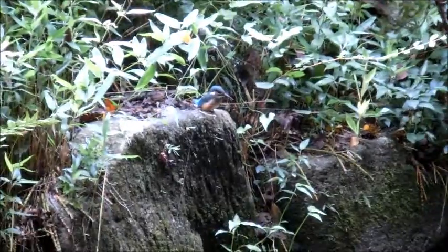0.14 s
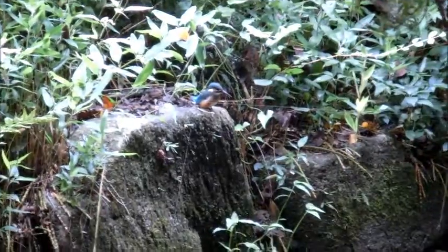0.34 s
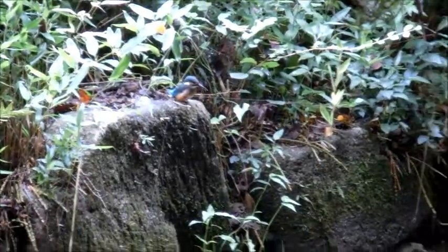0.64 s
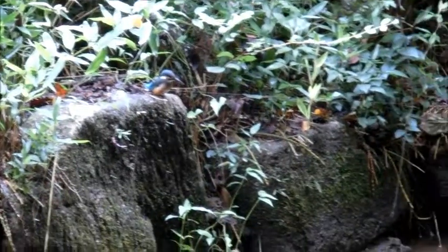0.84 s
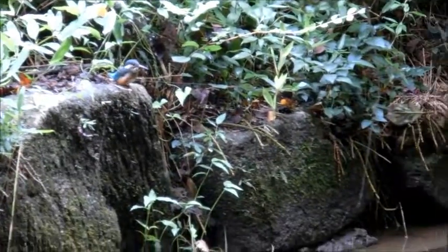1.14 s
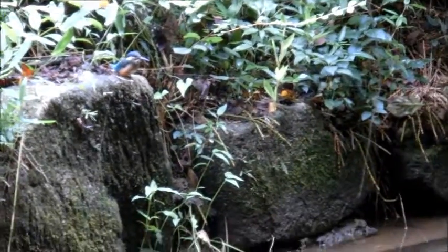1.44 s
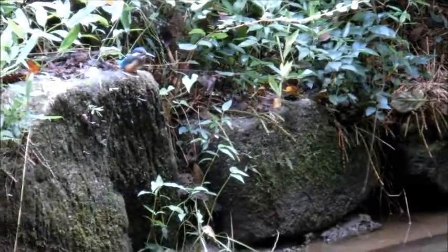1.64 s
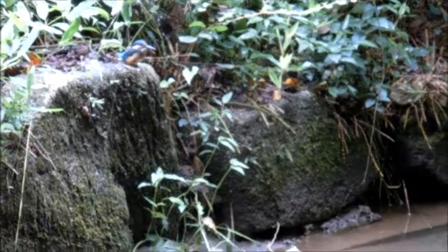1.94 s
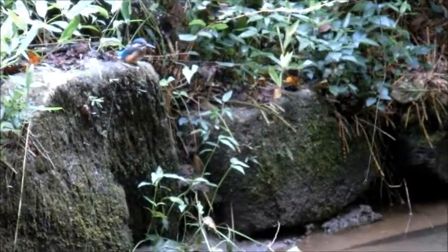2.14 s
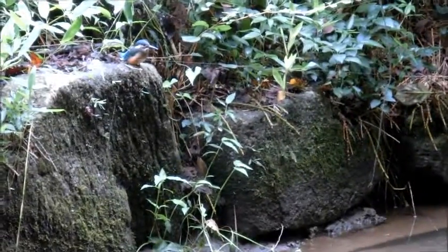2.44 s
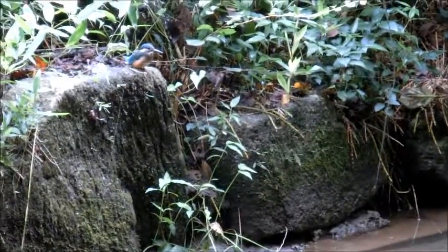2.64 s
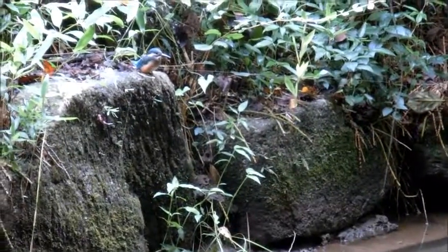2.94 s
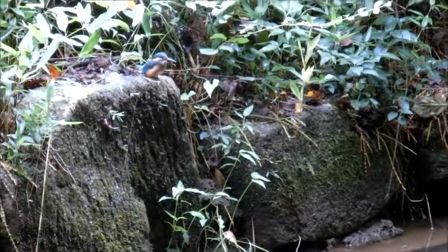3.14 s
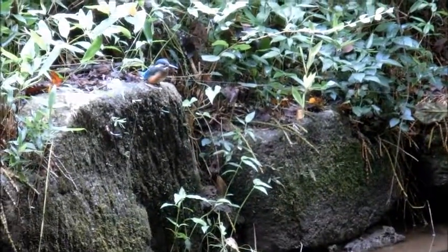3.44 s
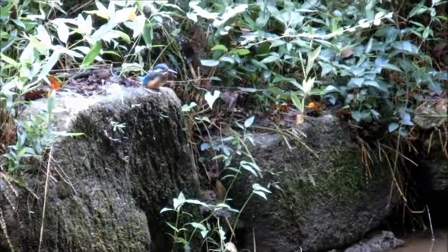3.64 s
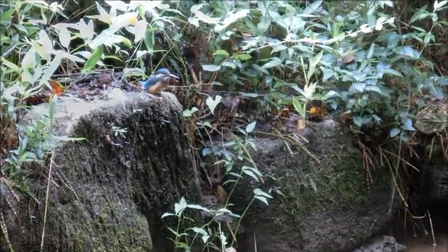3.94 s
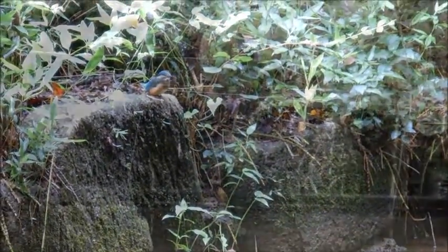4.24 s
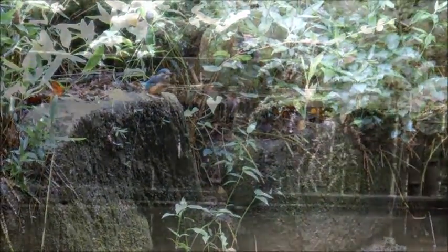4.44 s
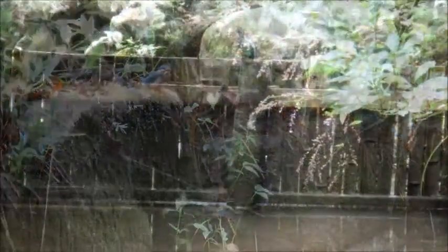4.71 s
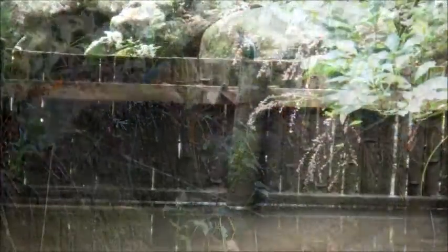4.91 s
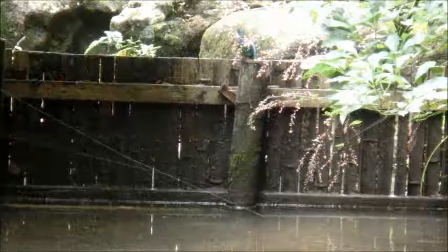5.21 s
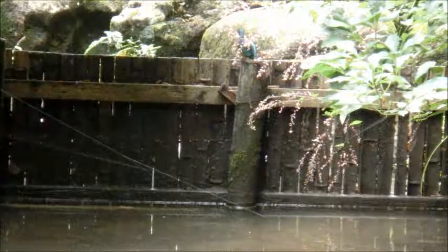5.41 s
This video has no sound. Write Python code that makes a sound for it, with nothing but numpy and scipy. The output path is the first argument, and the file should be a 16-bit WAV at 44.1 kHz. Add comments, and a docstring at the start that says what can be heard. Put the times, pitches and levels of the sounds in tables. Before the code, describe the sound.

A distant stereo microphone hears countless cicadas as a sizzling high hiss over very soft air, with nearer singers giving short ringing buzzes. Four faint, rasping bird calls rise behind them, the last barely audible. After about four seconds the scene blends smoothly into another pond spot: the insects are quieter, water drums low and hollow, and a very high thin buzz enters near the end.

```python
"""Cicadas shrill in forest vegetation from the start: hiss shaped into a broad chorus near 5 kHz and a thinner,
throbbing one near 14 kHz, over soft air. Single singers, click trains ringing a body, buzz in short syllables.
From 0.8 s a far bird, a rising band of noise, caws about once a second. The broad layers fade down, then up again
into a second spot: from 4.2 s falling water drums in a hollow, resonant noise, and near 5 s a high singer starts."""
import sys
import numpy as np
from scipy import signal
from scipy.io import wavfile
from scipy.ndimage import uniform_filter1d

SR = 44100
rng = np.random.default_rng(int(sys.argv[2]) if len(sys.argv) > 2 else 0)


def put_to_file(sound):
    """Save the sound as 16-bit audio at rate SR, in the file named by the first command-line argument."""
    columns = np.atleast_2d(sound).T  # one column per channel
    safe = np.clip(columns, -1, 1)
    whole_steps = np.round(safe * 32767)
    wavfile.write(sys.argv[1], SR, whole_steps.astype(np.int16))


N = 245637

# Colour of distant water, leaves and wind. Each row: frequency in Hz, relative density in dB per Hz.
AIR_SPECTRUM = [(12, -35), (20, -7), (49, 2), (130, -3.5), (182, -1.5), (323, -4), (1180, -4), (1960, -2.5),
                (2590, -12), (3200, -22), (4160, -21), (7040, -120)]
# Colour of the broad chorus. Each row: frequency in Hz, relative density in dB per Hz.
LOW_CHORUS_SPECTRUM = [(1290, -40.5), (2200, -18.5), (2930, -19), (3700, -9.5), (4120, -5.5), (5510, 0),
                       (6260, -0.5), (7810, -7.5), (9040, -20.5), (10000, -27), (13000, -38), (22000, -120)]
# Colour of the thin, high chorus. Each row: frequency in Hz, relative density in dB per Hz.
HIGH_CHORUS_SPECTRUM = [(5060, -26), (8600, -11.5), (9100, -15.5), (9790, -12), (11000, -5.5), (13800, 0),
                        (15700, 2), (17000, -9)]
# Syllables of single singers. Each row: start in seconds, end in seconds, level in dB, number of the partial
# on which the drum rings, lift of that partial in dB, clicks per second at the start, and at the end.
SINGER_SYLLABLES = [ (.05, .38, -34.5, 14, 4, 347, 360), (.38, .6, -30.5, 15, 6, 349, 357.5),
                    (.56, .78, -34.5, 14, 5, 356, 355), (.05, .3, -35.5, 15, 3, 379, 381.5),
                    (.48, .64, -35.5, 13, 4, 383.5, 387), (.78, .95, -40.5, 14, 3, 319.5, 324.5),
                    (.98, 1.38, -35.5, 13, 3, 351, 357.5), (1.3, 1.62, -37.5, 13, 4, 306.5, 307),
                    (1.38, 1.6, -34.5, 15, 3, 346.5, 346), (1.6, 1.95, -36.5, 12, 6, 353.5, 355),
                    (1.76, 1.96, -34.5, 14, 7, 358, 365.5), (1.88, 2.15, -41.5, 13, 3, 322, 322.5),
                    (2.0, 2.35, -39.5, 13, 4, 352.5, 355.5), (2.3, 2.5, -38.5, 15, 4, 378.5, 383),
                    (2.5, 2.7, -37.5, 13, 10, 389.5, 393), (2.68, 2.9, -40.5, 16, 12, 353, 353),
                    (2.9, 3.12, -42.5, 15, 3, 329.5, 330.5), (3.08, 3.3, -38.5, 12, 7, 378, 378.5),
                    (3.28, 3.45, -40.5, 14, 4, 361.5, 362), (3.5, 4.0, -46.5, 11, 6, 353, 353.5),
                    (4.25, 4.62, -45.5, 11, 7, 352.5, 355), (4.62, 4.9, -42.5, 13, 5, 332.5, 343.5),
                    (4.78, 4.97, -43.5, 16, 14, 336.5, 343.5), (4.88, 5.04, -35.5, 16, 14, 316.5, 321),
                    (5.0, 5.25, -42.5, 18, 4, 306, 308), (5.25, 5.55, -40.5, 13, 4, 340, 341), ]
# Drum and belly of a low singer. Each row: resonance in Hz, width of each pass in Hz, relative level in dB.
LOW_BELLY = [(4400, 900, 0), (5300, 900, 0), (3300, 600, -9)]
# Drum and belly of the high singer. Each row: resonance in Hz, width of each pass in Hz, relative level in dB.
HIGH_SINGER_BELLY = [(13400, 1100, -5), (14200, 1200, 3)]
# Calls of the bird. Each row: start in seconds, length in seconds, level in dB,
# centre of the rasp at the start in Hz, its rise in Hz.
BIRD_CAWS = [(.8, 0.29, -49.5, 1780, 290), (1.801, 0.28, -49, 1780, 420), (2.8, .18, -51.5, 1680, 420),
             (3.86, .14, -58, 1740, 120)]
# Level of the drumming water. Each row: time in seconds, level in dB.
POND_LEVEL = [(4.2, -70), (4.38, -56.5), (4.55, -53), (4.62, -59), (4.75, -56), (4.97, -57.5), (5.17, -48),
              (5.25, -50), (5.5, -45.5), (5.57, -46)]
# Air pocket under the falling water. Each row: resonance in Hz, width of each pass in Hz, relative level in dB.
POND_HOLLOW = [(178, 67, 0.5), (368, 63, -7), (125, 120, -6)]
# Stereo spread of the hiss layers. Each row: frequency in Hz, left-right likeness from 0 to 1.
STEREO_LIKENESS = [(60, 0.32), (120, 0.05), (240, 0.043), (480, 0.19), (950, 0.066), (1890, 0.16),
                   (3770, 0.93), (7520, 0.38), (15000, 0.08)]
# Stereo balance of the hiss layers. Each row: frequency in Hz, left minus right in dB.
STEREO_LEAN = [(60, -2.5), (180, -1), (550, -2.0), (1650, -1.5), (4970, -0.5), (15000, -1.5)]

GAP_HZ, GAP_WIDTH_HZ, EDGE_HZ = 15300, 600, 15740
FADE_IN_S, FADE_IN_DB = 0.27, -1  # the first spot starts this far down and comes up
OUT_FROM_S, OUT_TO_S = 0.35, 5.61  # then fades in a straight line of gain
IN_FROM_S, IN_TO_S = 4.07, 5.29  # the second spot fades in the same way
DIP_S, DIP_WIDTH_S, DIP_DB = 0.222, 0.015, -3.5  # the level dips briefly
# Full level of each broad layer: first spot in dB, its easing in dB per second, second spot in dB.
AIR_DB, LOW_DB, HIGH_DB = (-43.5, -0.38, -49.5), (-24, 0.006, -30), (-19, -0.26, -28)
HIGH_START_S, HIGH_SWELL_S, HIGH_FROM_DB, HIGH_SINGER_DB, HIGH_EASE_DB_PER_S = 5.06, 0.12, -48, -39.5, -5
HIGH_RATE_HZ, HIGH_SAG_HZ_PER_S = 198.8, -5  # clicks per second at the start, and their drift


def gain_of(db):
    """Decibels to gain."""
    return 10 ** (np.asarray(db) / 20)


def evened(x):
    """Scales to rms 1."""
    return x / np.sqrt(np.mean(x ** 2) + 1e-20)


def read(points, hz):
    """Reads a spectrum table on a log-frequency axis."""
    f, value = np.transpose(points)
    return np.interp(np.log(hz + 1), np.log(f + 1), value)


def resonate(x, hz, width):
    """Shifts the curve hz down to zero, smooths, and shifts back: a resonance of gain 1."""
    turn = np.exp(2j * np.pi * np.cumsum(hz * np.ones(len(x))) / SR)
    r = np.exp(-np.pi * width / SR)
    smooth = signal.lfilter([1 - r], [1, -r], x / turn + 1e-18)
    return 2 * (turn * smooth).real


def resonate_twice(x, hz, width):
    """Two equal resonances in a row, for steeper skirts."""
    return resonate(resonate(x, hz, width), hz, width)


def body(x, modes):
    """Steep resonances side by side, as in a hollow body."""
    return evened(sum(gain_of(db) * resonate_twice(x, hz, width) for hz, width, db in modes))


def placed(sounds):
    """Lays (start s, sound) pairs on one track."""
    out = np.zeros(N + SR)
    for s, sound in sounds:
        out[round(s * SR):][:len(sound)] += sound
    return out[:N]


def forest(x, wet_db, t60=.25):
    """Trunks and leaves scatter a sound back as sparse echoes, other ones for each ear; t60 in seconds."""
    t = np.arange(SR // 2) / SR
    signs = rng.choice([-1., 1.], (2, len(t)))
    sparse = rng.random((2, len(t))) < .045
    taps = signs * sparse * gain_of(-60 * t / t60)
    taps /= np.linalg.norm(taps[0])
    echoes = signal.fftconvolve(x[None], taps, axes=1)[:, :N]
    return x + gain_of(wet_db) * echoes


def crossfade(first_db, ease_db_per_s, second_db):
    """Gain of a broad layer while one spot fades into the other; their powers add."""
    t = np.arange(N) / SR
    start_db = np.interp(t, [0, FADE_IN_S], [FADE_IN_DB, 0])
    start_db += DIP_DB * np.exp(-((t - DIP_S) / DIP_WIDTH_S) ** 2)
    first = gain_of(first_db + ease_db_per_s * t + start_db)
    first *= np.interp(t, [OUT_FROM_S, OUT_TO_S], [1, 0])
    second = gain_of(second_db) * np.interp(t, [IN_FROM_S, IN_TO_S], [0, 1])
    return np.hypot(first, second)


def hiss(spectrum, patchy_db, throb_db=0., throb_hz=16., size=512):
    """Two-channel noise of countless far sources, with drifting patches and a throb whose timing differs by pitch."""
    hop, hz = size // 4, np.fft.rfftfreq(size, 1 / SR)
    frames = N // hop + 5
    a, b, c, d, patches, lag = rng.standard_normal((frames, len(hz), 6)).T
    # smooth along time, then across pitch
    patches = uniform_filter1d(patches, size=4000 // hop, axis=1)
    patches = evened(uniform_filter1d(patches, size=4, axis=0))
    lag = uniform_filter1d(lag, size=150, axis=1)
    lag = evened(uniform_filter1d(lag, size=60, axis=0))
    t = np.arange(frames) * hop / SR
    throb = np.sin(2 * np.pi * throb_hz * t + 1.2 * lag)
    throb *= np.clip(hz / 4000 - 2.4, 0, 1)[:, None]  # sets in above 9.6 kHz, full from 13.6 kHz

    same = np.clip(read(STEREO_LIKENESS, hz), -1, 1)[:, None]
    left = a + 1j * b
    right = same * left + np.sqrt(1 - same ** 2) * (c + 1j * d)
    z = np.array([left, right])
    z *= gain_of(read(spectrum, hz)[:, None] + patchy_db * patches + throb_db * throb)
    z *= gain_of(np.array([.5, -.5])[:, None, None] * read(STEREO_LEAN, hz)[:, None])
    return evened(signal.istft(z, nperseg=size, noverlap=size - hop)[1][:, :N])


def air():
    """Distant water, leaves and wind blend into a soft hiss."""
    return crossfade(*AIR_DB) * hiss(AIR_SPECTRUM, patchy_db=1.5, size=2048)


def pond():
    """The falling water, plain noise, drums the hollow below it."""
    s, db = np.transpose(POND_LEVEL)
    t = np.arange(s[0], s[-1], 1 / SR)
    drumming = body(rng.standard_normal(len(t)), POND_HOLLOW)
    return placed([(s[0], drumming * gain_of(np.interp(t, s, db)))])


def caw(start, length, db, hz, rise_hz):
    """A hoarse call of which only one rising band carries through the leaves."""
    t = np.arange(0, length, 1 / SR)
    centre = hz + rise_hz * t / length
    rasp = resonate_twice(rng.standard_normal(len(t)), centre, 300)
    return start, evened(rasp) * gain_of(db) * signal.windows.tukey(len(t), .5)


def high_chorus():
    """Countless high singers blur into a thin hiss that throbs."""
    return crossfade(*HIGH_DB) * hiss(HIGH_CHORUS_SPECTRUM, patchy_db=1.4, throb_db=0.9, throb_hz=16.3)


def low_chorus():
    """Countless low singers blur into a hiss, with fainter single ones just making themselves heard."""
    level = crossfade(*LOW_DB)
    out = level * hiss(LOW_CHORUS_SPECTRUM, patchy_db=1.51)
    return out + gain_of(-17) * level * forest(far_singers(), wet_db=-4)


def far_singers(count=20):
    """Fainter singers, each short syllable rising a little from its own rate."""
    # columns: start s, clicks per second, length s, relative level dB, ringing pitch Hz
    spread, lowest = [5.4, 90, .12, -4, 1800], [0, 305, .12, 0, 4200]
    draws = rng.random((count, 5)) * spread + lowest
    return evened(placed(syllable(s, s + length, db, hz // rate, 9., rate, 1.012 * rate)
                         for s, rate, length, db, hz in draws))


def buzz(rate, modes, jitter, partials):
    """A click train whose rate wavers slightly rings the insect's body; only the partials near the body matter."""
    waver = evened(uniform_filter1d(rng.standard_normal(len(rate)), size=900))
    turns = np.cumsum(rate * (1 + jitter * waver)) / SR
    clicks = sum(np.cos(2 * np.pi * k * turns) for k in partials)
    return body(clicks, modes)


def high_singer():
    """A thin buzz that swells in and eases while its clicks slow a little."""
    t = np.arange(0, N / SR - HIGH_START_S, 1 / SR)
    rate = HIGH_RATE_HZ + HIGH_SAG_HZ_PER_S * t
    sound = buzz(rate, HIGH_SINGER_BELLY, .0001, partials=range(55, 81))
    level_db = np.interp(t, [0, HIGH_SWELL_S], [HIGH_FROM_DB, HIGH_SINGER_DB])
    level_db += HIGH_EASE_DB_PER_S * np.maximum(t - HIGH_SWELL_S, 0)
    return placed([(HIGH_START_S, sound * gain_of(level_db))])


def syllable(start, end, db, partial, lift_db, from_rate, to_rate):
    """One swell of a low singer; the drum tightens with the click rate, so one partial stands out."""
    rate = np.linspace(from_rate, to_rate, round((end - start) * SR))
    clicks = buzz(rate, LOW_BELLY, .0004, partials=range(8, 19))
    ringing = resonate(clicks, partial * rate, 120)
    sound = clicks + (gain_of(lift_db) - 1) * ringing
    return start, gain_of(db) * evened(sound) * signal.windows.tukey(len(rate), .4)


def scene():
    """Air, pond and bird behind, then the choruses and the single singers."""
    out = air()
    out += forest(pond(), wet_db=-12.5) * gain_of([[-.7], [.7]])  # left, right dB
    out += forest(placed(caw(*row) for row in BIRD_CAWS), wet_db=-16)
    out += high_chorus()
    out += low_chorus()
    out += forest(high_singer(), wet_db=9.5) * gain_of([[-1.5], [1.5]])  # left, right dB
    return out + forest(placed(syllable(*row) for row in SINGER_SYLLABLES), wet_db=-9)


def record(dry):
    """A narrow gap near the top of the treble, then the band limit."""
    gapped = signal.lfilter(*signal.iirnotch(GAP_HZ, GAP_HZ / GAP_WIDTH_HZ, SR), dry)
    lowpass = signal.firwin(1023, EDGE_HZ, window=("kaiser", 9), fs=SR)
    return signal.oaconvolve(gapped, lowpass[None], "same")


dry = scene()
out = record(dry)
put_to_file(out)
```